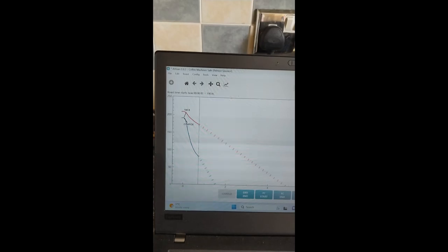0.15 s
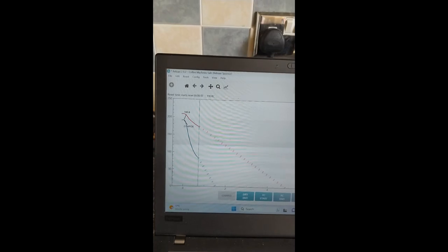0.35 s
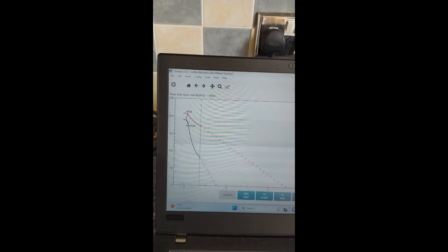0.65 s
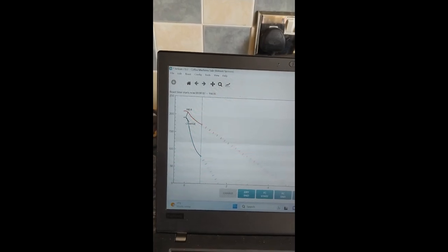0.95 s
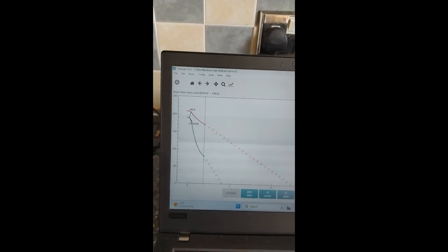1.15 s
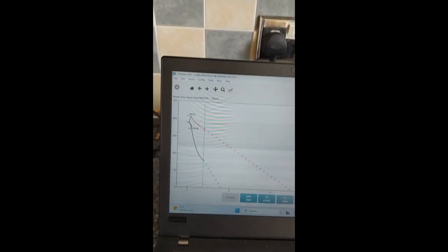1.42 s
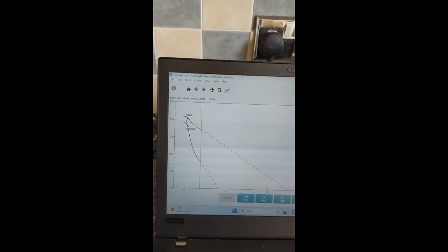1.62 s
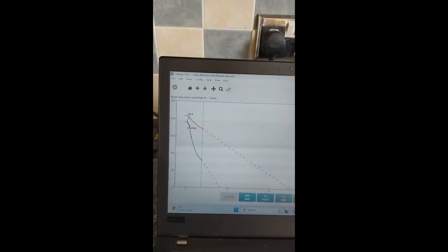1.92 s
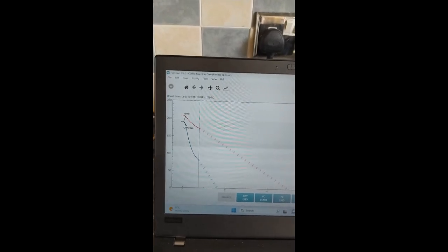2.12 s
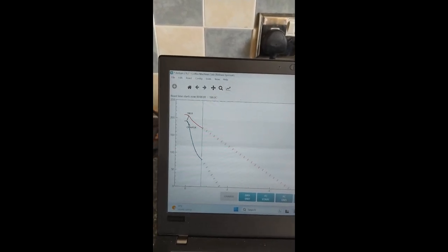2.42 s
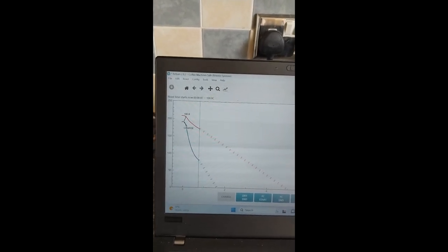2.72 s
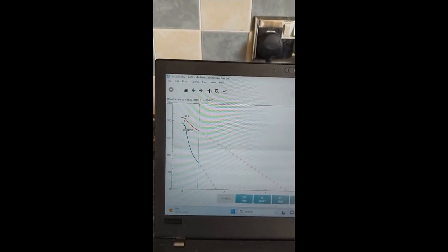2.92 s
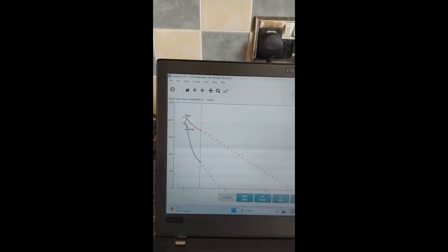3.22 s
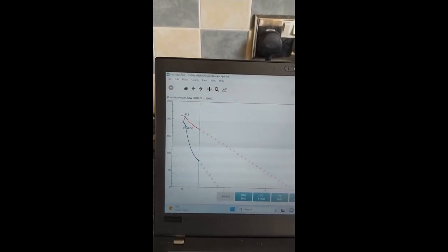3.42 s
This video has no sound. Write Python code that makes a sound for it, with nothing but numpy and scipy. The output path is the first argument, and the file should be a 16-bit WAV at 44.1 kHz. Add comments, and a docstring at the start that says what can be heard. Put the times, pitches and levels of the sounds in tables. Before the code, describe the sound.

Coffee beans churn continuously in a small steel drum for about 3.5 seconds, already running at the start and never pausing. Roughly every 0.4 seconds, from about 0.27 to 3.38, a sandy rustle swells into bright, hissy hail with duller patter, then drops quickly. Irregular clumps, sharp ticks and tiny metallic pings roughen it. Quiet fan rush and faint wavering motor hum sit underneath, close, with a short room tail.

```python
"""Coffee beans tumble in the drum of a small electric roaster in a tiled room, about two and a half pours a second.
Each pour is three layers of random contacts: a sliding rustle swells, then a bright hail and a duller patter.
Clumps add short spurts, lone ticks crack against the wall, and decaying noise gives shell rattle and room tail.
The metal sings in brief sines. Underneath, the fan is coloured noise and the motor a few wandering tones."""
import sys
import numpy as np
from scipy import signal
from scipy.fft import rfft, irfft
from scipy.io import wavfile
from scipy.ndimage import map_coordinates

SR = 44100
rng = np.random.default_rng(int(sys.argv[2]) if len(sys.argv) > 2 else 0)


def generate_wav(signal):
    """Clip the signal to [-1, 1] and save it as 16-bit WAV at the path in sys.argv[1]."""
    frames = np.transpose(np.atleast_2d(signal))
    scaled = np.clip(frames, -1, 1) * 32767
    pcm = np.round(scaled).astype(np.int16)
    wavfile.write(sys.argv[1], SR, pcm)


N = 156555
T = np.arange(N) / SR
BIN_HZ = np.arange(N // 2 + 1) * SR / N
SHELL_T60_S, ROOM_T60_S = 0.057, 0.11   # rattle inside the drum, tail of the room


def from_db(db):
    """Decibels to gain."""
    return 10 ** (np.asarray(db) / 20)


def rms_one(x):
    """Scale to rms 1."""
    return x / np.sqrt(np.mean(x ** 2) + 1e-20)


def per_bin(points):
    """Read a table over log frequency at every bin."""
    hz, value = np.transpose(points)
    return np.interp(np.log(BIN_HZ + 1e-3), np.log(hz), value)


def drift(rate_hz):
    """Slow random wander of rms 1: noise through two equal low-pass poles, run at every 40th sample."""
    step = 40
    pole = np.exp(-2 * np.pi * rate_hz * step / SR)
    noise = rng.standard_normal(N // step + 2002)
    slow = signal.lfilter([1], [1, -2 * pole, pole * pole], noise)[2000:]   # skip the filter's start
    return np.interp(np.arange(N) / step, np.arange(len(slow)), rms_one(slow))


def echoes(x, t60_s):
    """Dense dying reflections, different at each ear, as strong as the input; already ringing at the start."""
    length = SR // 6
    tail = rng.standard_normal((2, length)) * np.exp(-np.log(1000) * T[:length] / t60_s)
    tail /= np.sqrt(np.sum(tail ** 2, axis=1, keepdims=True))
    led_in = np.pad(x, (length - 1, 0), "reflect")
    return signal.oaconvolve(led_in[None], tail, "valid", axes=1)


# motor and fan tones: (f/Hz, left level/dB, right level/dB, lag of the right ear/rad)
MOTOR_TONES = [(161, -67.5, -67.5, 0), (301, -62, -59.5, 0), (443, -57.5, -70, 1.5), (575, -54, -63, 0),
               (872, -65, -66, 0), (1149, -55.5, -58.5, 2.8), (1724, -58, -52.5, 0)]
TONE_WANDER, TONE_FLUTTER_DB = 0.00197, 5.5   # rms share of the pitch, rms dB


def motor():
    """Faint tones that wander together with the speed and flutter separately at each ear."""
    turn = 2 * np.pi * np.cumsum(1 + TONE_WANDER * drift(1.71)) / SR
    out = np.zeros((2, N))
    for hz, left_db, right_db, lag in MOTOR_TONES:
        for ear, db in enumerate((left_db, right_db)):
            wave = np.sin(hz * turn - ear * lag + .5 * drift(7.8))
            flutter = from_db(TONE_FLUTTER_DB * drift(6.1))
            out[ear] += from_db(db) * rms_one(wave * flutter)
    return out


# colour of the air through fan and housing: (f/Hz, relative level per Hz/dB)
AIR_COLOUR = [(15, -3.5), (45, -6), (90, -21), (130, -7.5), (163, -1.5), (205, -7.5), (250, -8.5),
              (310, -3), (450, 2.5), (530, -1.5), (640, 4), (780, -1), (860, 3.5), (1000, -8), (1300, -7),
              (1700, 2), (2300, -7), (3200, -15.5), (10000, -23)]
# how alike the air is at both ears: (f/Hz, left-right correlation)
AIR_LIKENESS = [(40, 0.0025), (150, 0.78), (400, 0.48), (700, 0.5), (1100, 0), (3000, 0)]
AIR_DB = -41.5   # rms before the rumble swings
RUMBLE_HZ, RUMBLE_SWING_DB, RUMBLE_RATE_HZ = 110, 3.5, 7


def fan():
    """Air rushes through the housing: coloured noise, partly shared by the ears, lumpy in the bass."""
    mid, side = rfft(rng.standard_normal((2, N)))
    alike = np.clip(per_bin(AIR_LIKENESS), -1, 1)
    both = np.sqrt(1 + alike) * mid + np.sqrt(1 - alike) * side * np.array([[1], [-1]])
    air = from_db(AIR_DB) * rms_one(irfft(both * from_db(per_bin(AIR_COLOUR)), N))
    low_pass = signal.butter(2, RUMBLE_HZ, fs=SR, output="sos")
    rumble = signal.sosfiltfilt(low_pass, air, padtype="even")
    swing = from_db(RUMBLE_SWING_DB * drift(RUMBLE_RATE_HZ))
    return air + rumble * (swing - 1)   # swaps the steady rumble for the swinging one


# the metal sings as it is rubbed or knocked: (t/s, f/Hz, peak level/dB before the tail, half length/s)
SINGS = [(0.579, 9302, -24, .012), (.62, 870, -43, 0.034), (.621, 2756, -32, 0.0096),
         (.743, 7105, -23, 0.024), (1.413, 6330, -27, 0.014), (1.75, 9285, -19.5, 0.01),
         (2.558, 3617, -36, .013), (2.706, 633, -38, 0.011), (2.91, 9302, -30, 0.015),
         (3.349, 6718, -25, 0.015), (3.396, 7192, -29, .012), (3.413, 9689, -25, .012)]
SING_ROOM_DB = -14


def sings():
    """Short sines of the metal swell and fade, each with its room tail."""
    tone = np.zeros(N)
    for s, hz, db, half_s in SINGS:
        swell = np.exp(-((T - s) / half_s) ** 2)
        tone += from_db(db) * np.sin(2 * np.pi * hz * (T - s)) * swell
    return tone + from_db(SING_ROOM_DB) * echoes(tone, ROOM_T60_S)


# resonances of the steel drum: (f/Hz, lift/dB)
DRUM_RESONANCES = [(2170, 1.5), (2470, 1.5), (2760, 3.5), (3700, 2), (3870, 4.5), (4050, 2), (4360, 2.5),
                   (4740, 2.5), (5520, 4), (6450, 1.5), (7130, 3), (7760, 2), (8130, 2), (8590, 1.5),
                   (9280, 3.5), (9680, 2)]
DRUM_WIDTH_HZ = 45   # from the peak to half its lift in dB


def drum_db():
    """Lift that the resonances of the steel wall give to every bin."""
    return sum(db / (1 + ((BIN_HZ - hz) / DRUM_WIDTH_HZ) ** 2) for hz, db in DRUM_RESONANCES)


# where the beans are heard: (f/Hz, left minus right level/dB)
BEAN_PAN = [(1600, 2), (2900, 0.5), (3900, 2.5), (5300, 0.5), (6400, 3), (7200, 3.5), (8400, 6.5),
            (9400, 2.5), (10000, -5.5), (10800, 3.5), (12700, -1.5), (15000, 18)]


def pan_db():
    """Lean each pitch to its side: half the level difference up on one ear, half down on the other."""
    return per_bin(BEAN_PAN) * np.array([[.5], [-.5]])


# a vane empties: (t/s at the height of the pour, hail level/dB, slide level/dB, patter level/dB)
POURS = [(0.273, 1, 0.5, 1.5), (0.652, 0.5, -0.5, 1), (1.062, -1, 0, 1), (1.444, 1.5, 2, -0.5),
         (1.822, 1.5, 0.5, -1), (2.221, -0.5, 1, -1.5), (2.618, 1, 1.5, 1), (3.004, 0.5, 0.5, -1),
         (3.376, -1, 2, 1.5)]
# a clump of beans lands, against a full pour: (t/s, hail level/dB, slide level/dB, patter level/dB)
CLUMPS = [(.178, -12, -8, -22), (.24, -1, -8, 1), (.435, -1.5, -7, -9), (.49, -16, -18, -1),
          (.568, -4.5, -18, -1), (0.617, -0.5, 6, -2), (0.737, -1, -2, -11), (1.01, -16, -12, -2),
          (1.11, -10.5, -11, -14), (1.335, -6, 1, -22), (1.405, -3, 2, -8), (1.485, -12, -10, -0.5),
          (1.755, -4, -10, -8), (1.868, -5, 1.5, -8), (2.107, -1.5, -20, -19), (2.252, 2.5, -9, -4),
          (2.488, -11, 2.5, -16), (2.59, -1, -12, -12), (2.787, -1, -7, -2), (2.984, 4, -12, -9),
          (3.297, -3, -18, -14), (3.354, -9, 0.5, -8), (3.391, 2.5, -12, -15), (3.425, -4, -5, -10)]
HAIL_COLUMN, SLIDE_COLUMN, PATTER_COLUMN = 1, 2, 3
CLUMP_S = 0.012
SURGE_DB, SURGE_RATE_HZ = 0.47, 55   # uneven flow of beans


def bean_flow(column, rise_s, hold_s, fall_s, rest_db):
    """Power of the moving beans: a steady churn, a swell for each vane, a spurt for each clump."""
    flow = from_db(rest_db) ** 2
    for row in POURS:
        early = np.maximum(row[0] - hold_s / 2 - T, 0)
        late = np.maximum(T - row[0] - hold_s / 2, 0)
        flow = flow + from_db(row[column]) ** 2 * np.exp(-early / rise_s - (late / fall_s) ** 2)
    for row in CLUMPS:
        flow = flow + from_db(row[column]) ** 2 * np.exp(-((T - row[0]) / CLUMP_S) ** 2)
    return flow * from_db(SURGE_DB * drift(SURGE_RATE_HZ)) ** 2


def impacts(flow, per_s, spread_db):
    """Random bean contacts; more flow makes them both denser and harder."""
    sizes = from_db(spread_db * np.minimum(rng.exponential(1, N), 5))
    signs = rng.choice([-1, 1], N)
    struck = rng.random(N) < per_s * np.sqrt(flow) / SR
    hardness = np.sqrt(np.sqrt(flow))   # with the density, power follows the flow
    return sizes * signs * struck * hardness


SHELL_DB, ROOM_DB = 6.5, -2.5   # echoes against the direct contact


def beans(flow, per_s, spread_db, colour, spots=14):
    """Contacts at many spots of the drum, each with its own ear delay, shell rattle and room tail."""
    out = np.zeros((2, N))
    for spot in range(spots):
        clicks = impacts(flow, per_s / spots, spread_db)
        out += np.array([np.roll(clicks, spot), clicks])   # left ear lags by 0 to 13 samples
        out += from_db(SHELL_DB) * echoes(clicks, SHELL_T60_S)
        out += from_db(ROOM_DB) * echoes(clicks, ROOM_T60_S)
    gain = from_db(per_bin(colour) + drum_db() + pan_db())
    return rms_one(irfft(rfft(out) * gain, N)) * np.sqrt(flow.mean())


# a single bean cracks against the wall: (t/s, level/dB over TICK_DB)
TICKS = [(.1769, -10), (.2462, 5), (.4742, 3), (.5673, -6), (.6158, 5), (.7431, -1), (1.6375, -7),
         (1.7578, -8), (1.879, 0), (2.0571, 2), (2.0699, -7), (2.7866, 1), (3.2993, 2)]
TICK_DB, TICK_RATTLE_DB = -3, 3   # click before colouring, rattle against the click


def ticks():
    """Lone hard contacts in the colour of the hail, each with a short rattle of the shell."""
    clicks = np.zeros(N)
    for s, db in TICKS:
        clicks[int(s * SR)] = from_db(TICK_DB + db)
    struck = clicks + from_db(TICK_RATTLE_DB) * echoes(clicks, SHELL_T60_S)
    return irfft(rfft(struck) * from_db(per_bin(HAIL_COLOUR) + pan_db()), N)


# colour of beans dropping back into the heap: (f/Hz, relative level per Hz/dB)
PATTER_COLOUR = [(700, -24), (1100, -10), (1550, -2.5), (1900, -5.5), (2200, 2), (2800, -2), (4000, -8.5),
                 (8000, -25.5)]
PATTER_DB, PATTER_PER_S, PATTER_SPREAD_DB = -37.5, 2500, 2   # level and contacts at unit flow


def patter():
    """Dull drops into the heap: sparse contacts of uneven size, rising fast with each pour."""
    flow = bean_flow(PATTER_COLUMN, rise_s=0.019, hold_s=0.085, fall_s=0.045, rest_db=-4.5)
    return from_db(PATTER_DB) * beans(flow, PATTER_PER_S, PATTER_SPREAD_DB, PATTER_COLOUR)


# colour of beans sliding over each other: (f/Hz, relative level per Hz/dB)
SLIDE_COLOUR = [(1000, -23), (1700, -27), (2400, -9), (2900, -0.5), (3400, -1), (3900, 2.5), (4600, 3.5),
                (5300, 2), (7000, 0), (10000, -28), (15000, -58)]
SLIDE_DB, SLIDE_PER_S, SLIDE_SPREAD_DB = -29, 6000, 0.5   # level and contacts at unit flow


def slide():
    """Rustle of beans rubbing past each other: dense small contacts that swell slowly into each pour."""
    flow = bean_flow(SLIDE_COLUMN, rise_s=0.12, hold_s=0.034, fall_s=0.04, rest_db=-6)
    return from_db(SLIDE_DB) * beans(flow, SLIDE_PER_S, SLIDE_SPREAD_DB, SLIDE_COLOUR)


# colour of beans striking the wall: (f/Hz, relative level per Hz/dB)
HAIL_COLOUR = [(800, -30.5), (1500, -24.5), (2200, -14), (3300, -25), (5200, -19), (6050, -14), (6400, -3),
               (7200, -1.5), (8300, 1), (9500, -1.5), (10100, -4.5), (10700, -13.5), (12100, -15.5),
               (12700, -16), (14300, -23), (15000, -24), (15500, -35)]
HAIL_DB, HAIL_PER_S, HAIL_SPREAD_DB = -21.5, 5500, 0   # level and contacts at unit flow


def hail():
    """Bright hail on the steel wall: dense contacts over a strong churn between pours."""
    flow = bean_flow(HAIL_COLUMN, rise_s=0.099, hold_s=0.049, fall_s=0.042, rest_db=-1.5)
    return from_db(HAIL_DB) * beans(flow, HAIL_PER_S, HAIL_SPREAD_DB, HAIL_COLOUR)


# how strongly each pitch shimmers: (f/Hz, share of SHIMMER_DB)
SHIMMER_DEPTH = [(1500, .6), (2600, 1.14), (5800, 1.1), (6800, 0.77), (9500, 0.58), (11500, 2.8)]
SHIMMER_DB, SHIMMER_HZ, SHIMMER_S = 4.5, 85, .04   # depth, and grid spacing in pitch and time


def shimmer(x, size=1024):
    """Narrow pitches swell and fade at random, which coarsens the hiss; mean square gain stays 1."""
    hz, s, frames = signal.stft(x, SR, nperseg=size)
    where = np.meshgrid(hz / SHIMMER_HZ, s / SHIMMER_S, indexing="ij")
    swell = map_coordinates(rng.standard_normal(size=(400, 200)), where, order=2, mode="mirror")
    depth_db = SHIMMER_DB * np.interp(hz, *np.transpose(SHIMMER_DEPTH))[:, None]
    gain = from_db(depth_db * np.minimum(swell, 1.5))
    gain /= np.sqrt(np.mean(gain ** 2, axis=1, keepdims=True))
    return signal.istft(frames * gain, SR, nperseg=size)[1][:, :N]


def scene():
    """Motor, fan, singing metal and tumbling beans together."""
    tumble = patter() + slide() + hail()
    return motor() + fan() + sings() + ticks() + shimmer(tumble)


CUTOFF_HZ = 15700


def record(dry):
    """The top is cut steeply."""
    low_pass = signal.ellip(12, .2, 90, CUTOFF_HZ, fs=SR, output="sos")
    return signal.sosfilt(low_pass, dry)


dry = scene()
out = record(dry)
generate_wav(out)
```